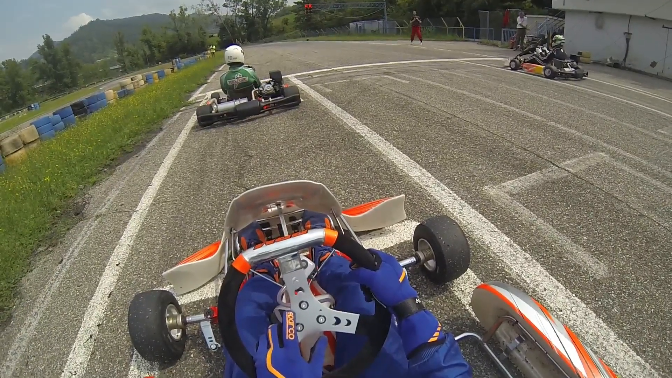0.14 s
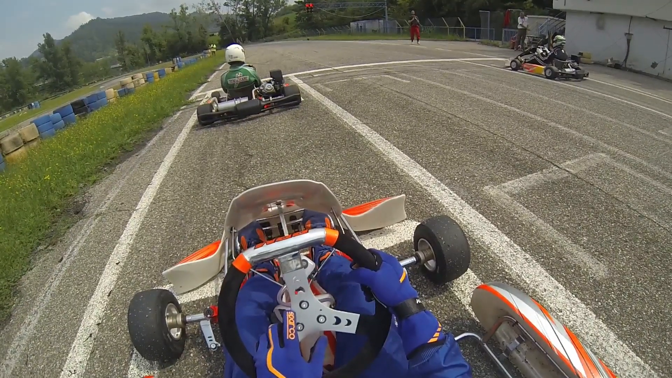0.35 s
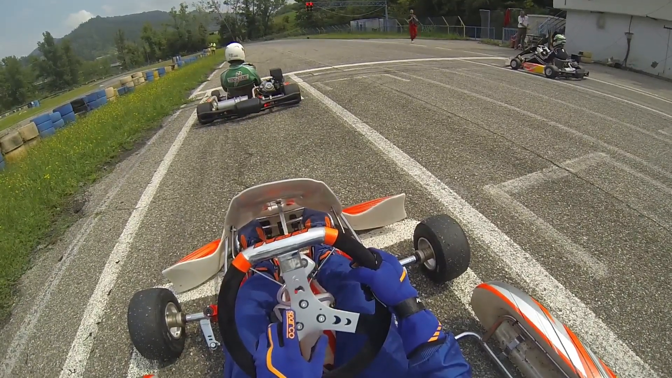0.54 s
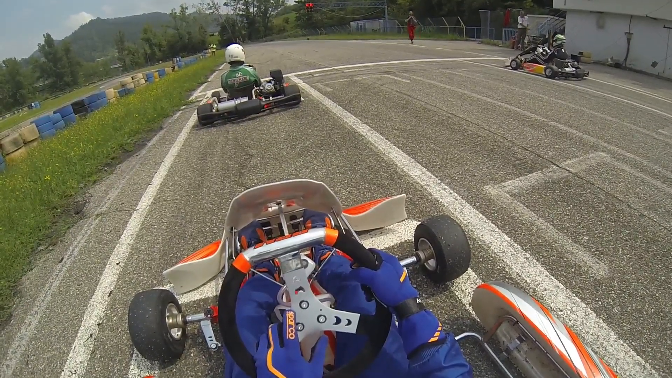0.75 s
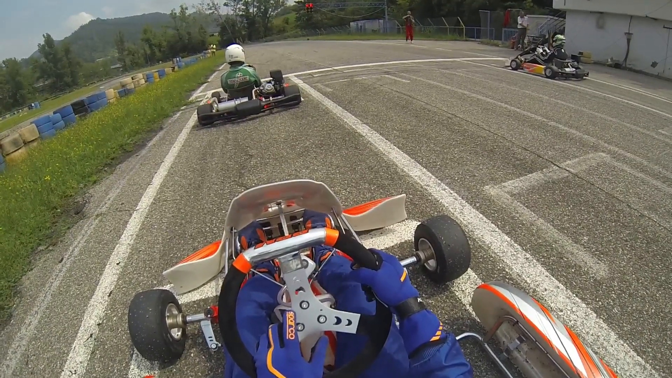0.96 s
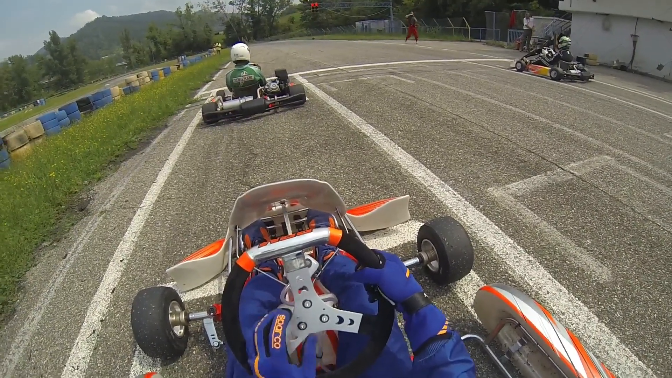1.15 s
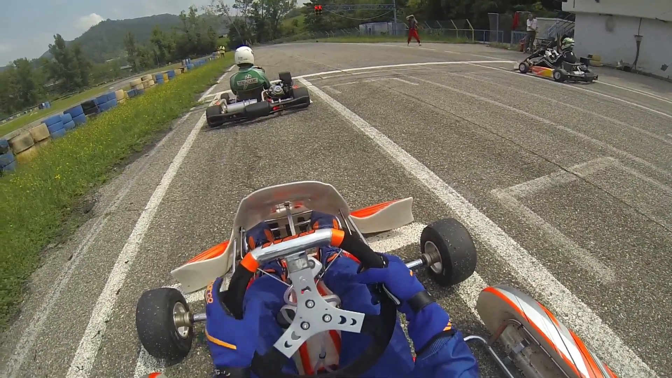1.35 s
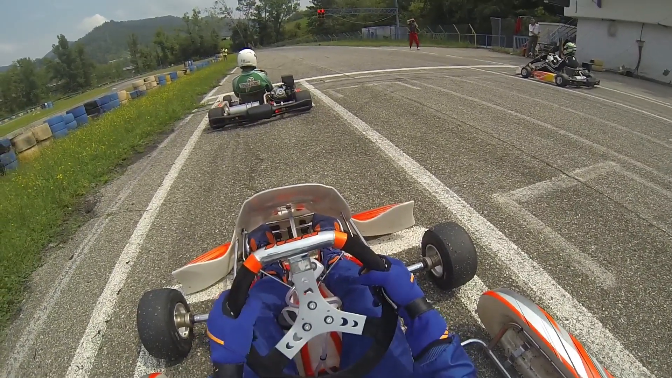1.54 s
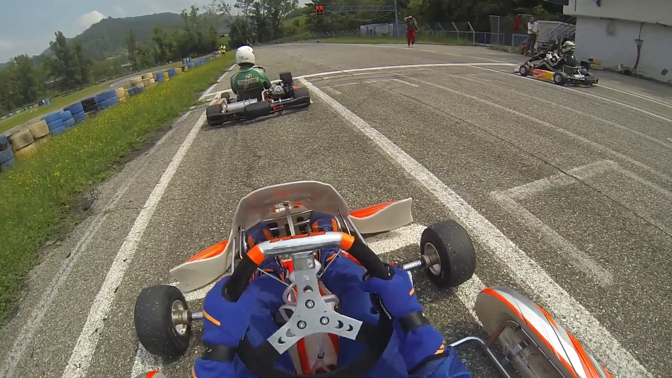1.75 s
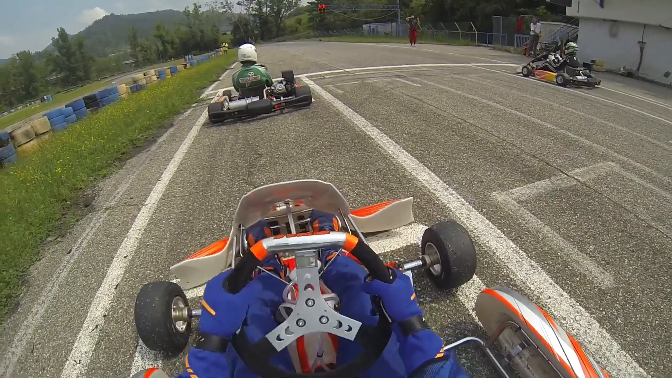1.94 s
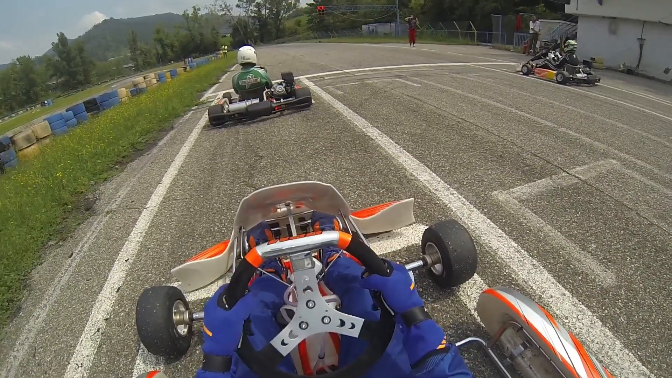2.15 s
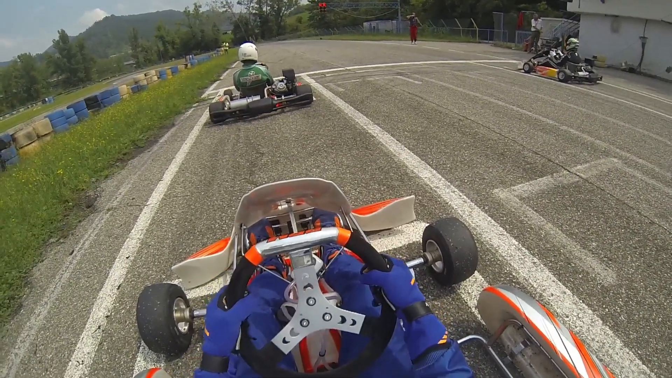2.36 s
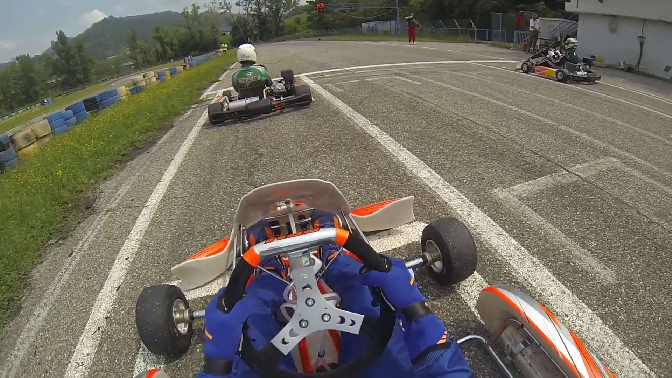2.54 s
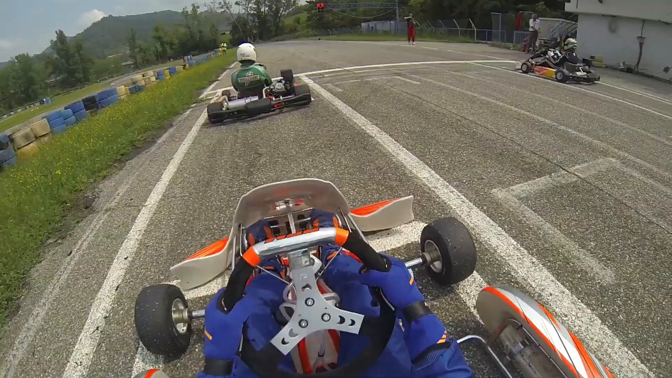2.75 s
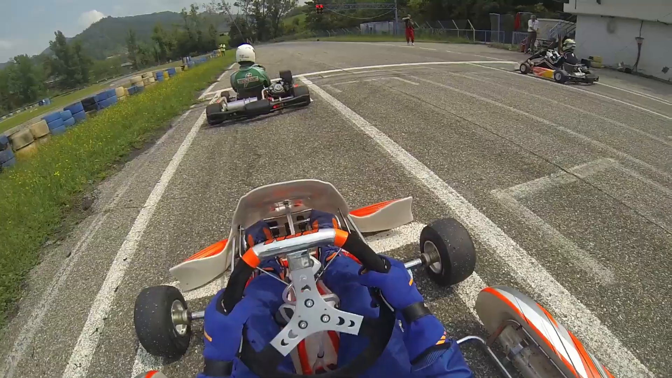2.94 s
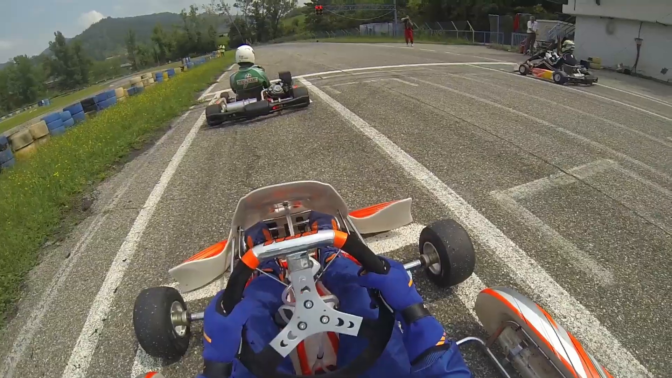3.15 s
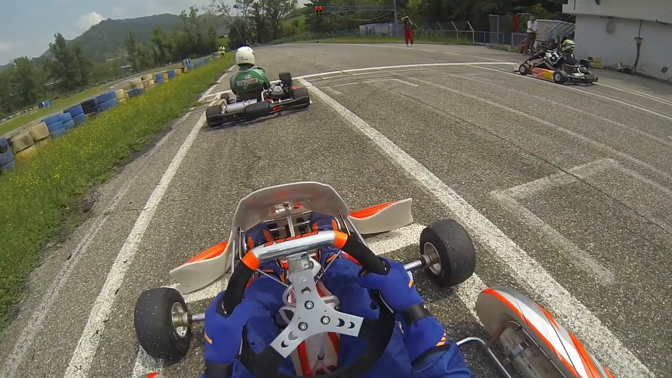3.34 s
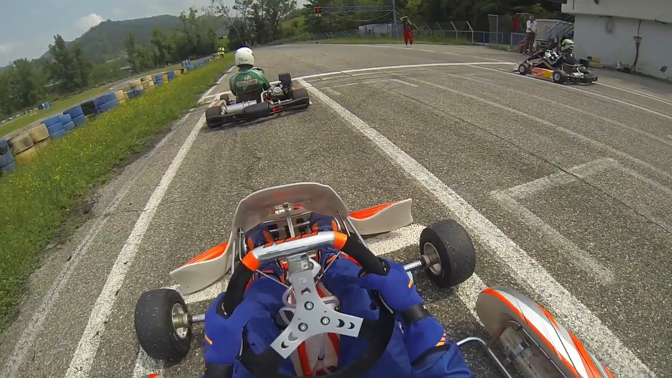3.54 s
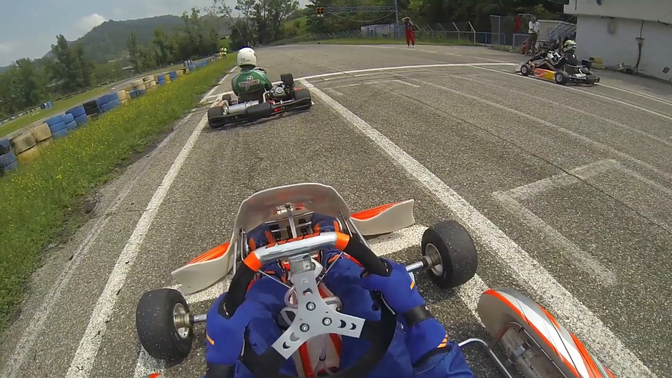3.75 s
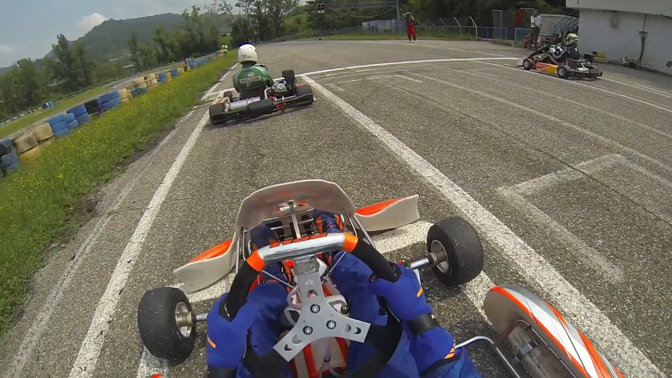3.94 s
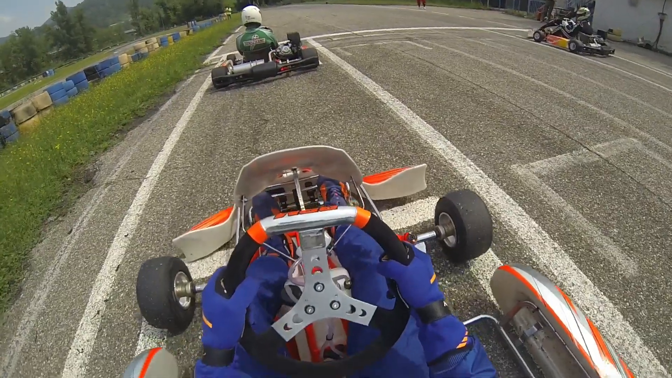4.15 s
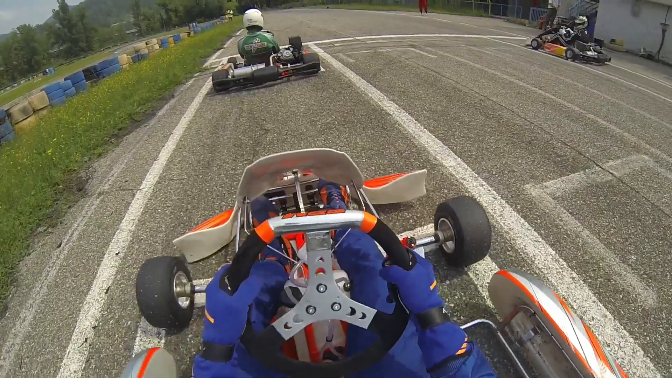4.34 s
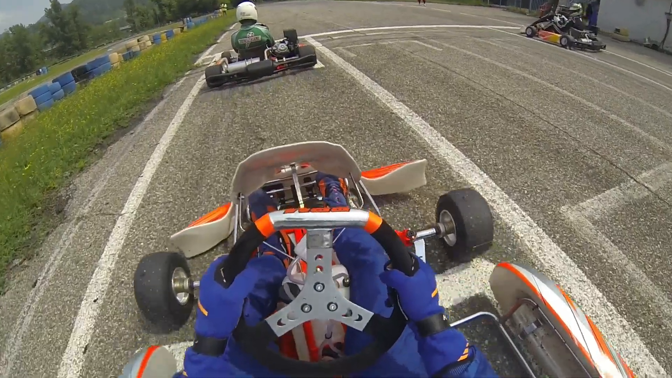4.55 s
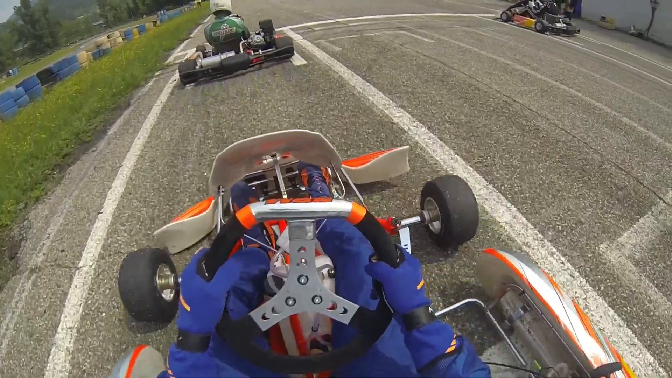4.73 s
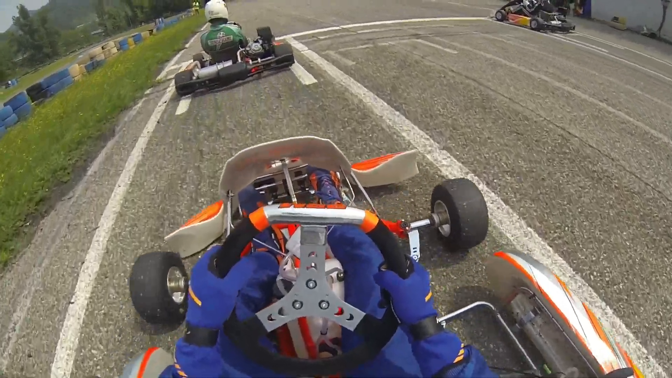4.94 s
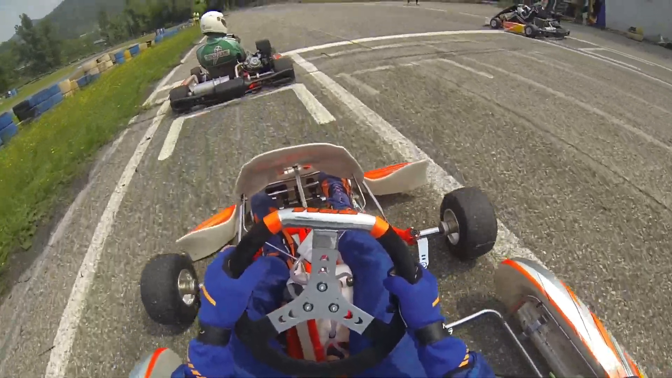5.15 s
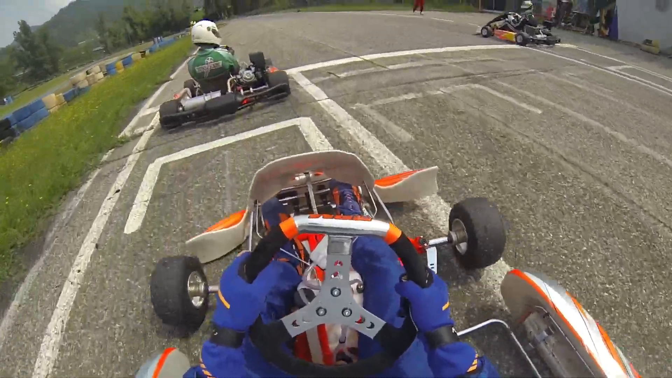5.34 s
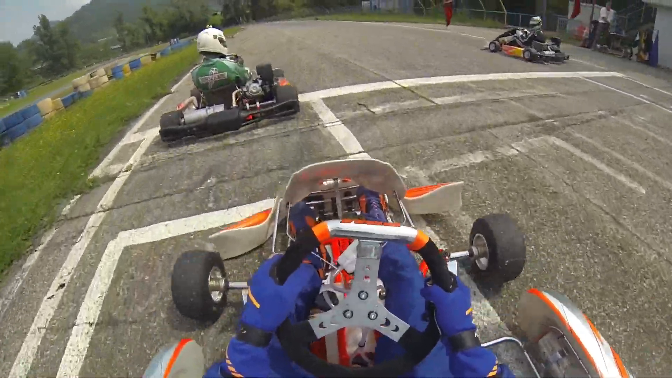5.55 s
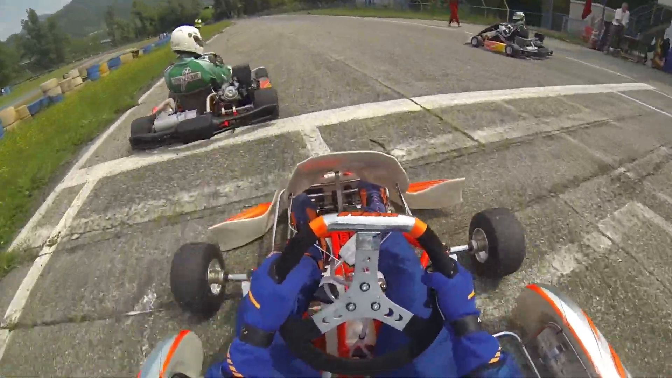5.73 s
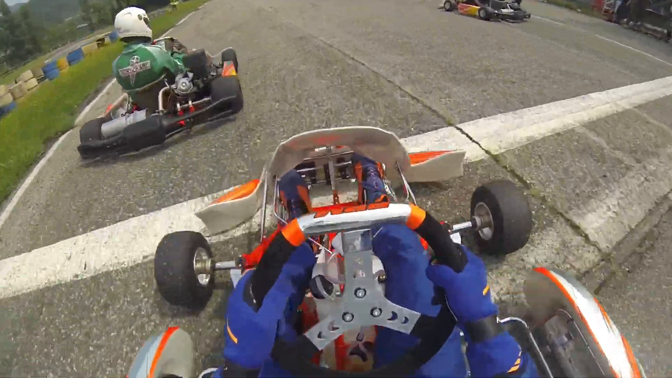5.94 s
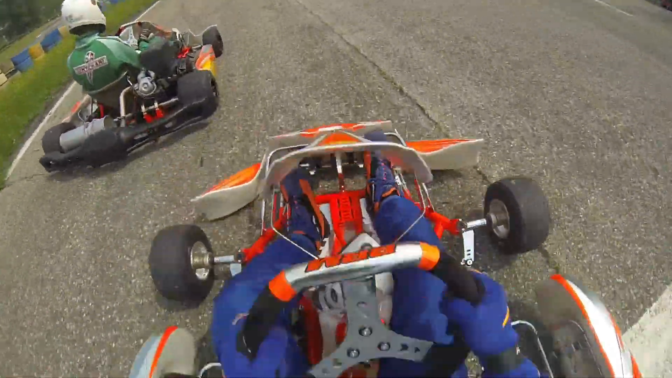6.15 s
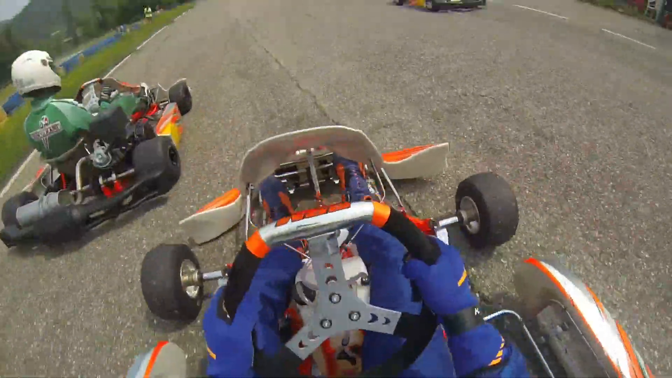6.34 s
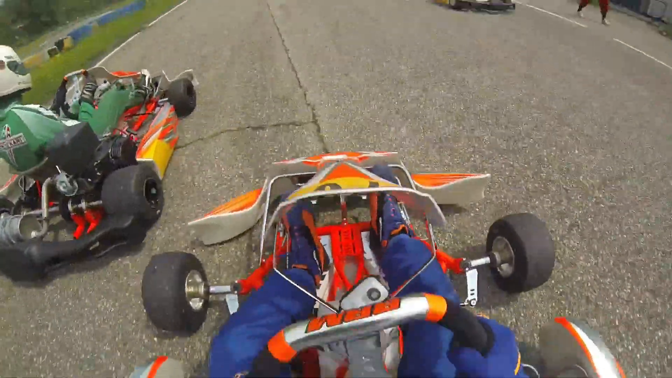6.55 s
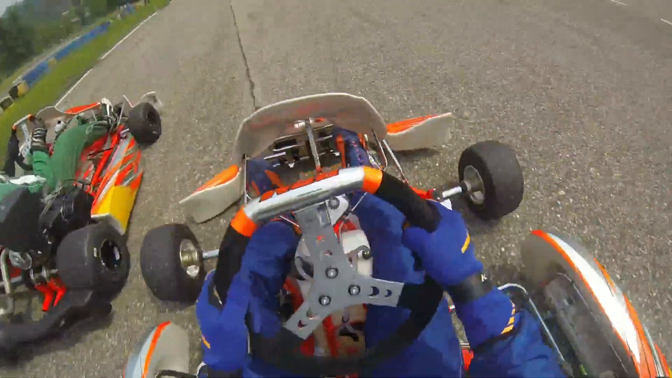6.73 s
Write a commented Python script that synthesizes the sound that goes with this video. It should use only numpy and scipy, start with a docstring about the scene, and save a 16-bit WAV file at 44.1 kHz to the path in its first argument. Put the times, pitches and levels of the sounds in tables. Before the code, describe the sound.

From 0 to about 3.8 seconds a small single-cylinder four-stroke kart engine idles evenly, around fifteen soft thumps a second, with dry valve and cover rattle between them and a low lumpy murmur of other idling karts. The sound is close, boxy and muffled, as from a sealed housing on the driver's helmet outdoors. At 3.8 it bogs for an instant, then catches with a few sharp cracks; the revs flare until about 4.3 and settle into a steady, much louder growling pull, raspy and ringing, with frame vibration, chain hiss and rolling rumble. From about 5.8 wind flutters low, and a thin chatter has crept in. Big gusts thud around 6.05. At about 6.15 the throttle lifts: bark and thump fall away, revs sag until 6.45, then recover slightly, while more deep wind thumps strike around 6.35 and 6.75 to the end at 6.8.

```python
"""Kart idling, pulling away and lifting off

A single-cylinder four-stroke idles among other karts, pulls away under throttle, then lifts off.
From inside a closed housing on the helmet one hears the exhaust thump and shaking frame as pulses and
sines locked to the firing cycle; clatter, bark, chain hiss and rolling chassis are noise swelling
each cycle, much of it rung by fixed bands of housing and engine shell. Late on, a narrow chatter,
fluttering wind and single low gusts join in."""
import sys
import numpy as np
from scipy import signal
from scipy.fft import rfft, irfft, next_fast_len
from scipy.io import wavfile
from scipy.ndimage import uniform_filter1d

SR = 44100
rng = np.random.default_rng(int(sys.argv[2]) if len(sys.argv) > 2 else 0)


def master(y):
    """Save y as 16-bit WAV."""
    cut = np.clip(np.atleast_2d(y).T, -1, 1)
    pcm = np.round(cut * 32767)  # scale
    wavfile.write(sys.argv[1], SR, pcm.astype(np.int16))


N = 299439
T = np.arange(N) / SR  # s
OPEN_S, LIFT_S = 3.8, 6.15  # the throttle opens; the foot is off


def undb(db):
    """Decibels to gain."""
    return 10 ** (np.asarray(db) / 20)


def unit(x):
    """Scale to rms 1."""
    return x / np.sqrt(np.mean(x ** 2))


def shape(table, hz):
    """Power response through points of f/Hz, level/dB joined on a log frequency axis."""
    f, db = np.transpose(table)
    return undb(np.interp(np.log(hz + 1), np.log(f), db)) ** 2


def rings(modes, hz):
    """Summed power response of steep resonances: f/Hz, half-width/Hz (6 dB down), level/dB."""
    return sum(undb(db) ** 2 / (1 + ((hz - f) / w) ** 2) ** 2 for f, w, db in modes)


def colour(x, power):
    """Causal filter with the given power response (minimum phase from the cepstrum)."""
    size = next_fast_len(N + SR, real=True)
    hz = np.arange(size // 2 + 1) * SR / size
    cepstrum = irfft(np.log(power(hz) + 1e-12) / 2, size)
    # fold the cepstrum onto positive time
    cepstrum[1:size // 2] *= 2
    cepstrum[size // 2 + 1:] = 0
    response = np.exp(rfft(cepstrum))
    return irfft(rfft(x, size) * response, size)[:N]


def housing(hz):
    """Power response of the ringing housing and engine shell."""
    # resonances: f/Hz, half-width/Hz, level/dB
    modes = [(375, 22, -16), (603, 39, -11.5), (955, 58, -8), (1114, 52, -6), (1593, 93.6, 2.5),
             (1882, 257, -8.5), (2192, 49, -6.5), (3075, 260, -21.5), (3786, 330, -18.5), (5035, 160, -25),
             (5390, 330, -24), (6540, 690, -31), (7764, 290, -25.5)]
    # floor between the resonances: f/Hz, level/dB
    floor = [(100, -32), (450, -24.5), (800, -16.5), (1270, -18.5), (2600, -22), (4500, -40.5),
             (8600, -39.5), (12000, -43.5), (13800, -48), (15000, -59)]
    return rings(modes, hz) + shape(floor, hz)


def walk(rate):
    """Wandering random signal of rms 1: levels held 1 / rate seconds, then slewed twice."""
    k = int(SR / rate)
    held = rng.standard_normal(4000)[np.arange(N) // k]
    slewed = uniform_filter1d(held, k)
    return unit(uniform_filter1d(slewed, k))


def gritty(spread_db):
    """Noise whose samples come in uneven sizes, like many small knocks."""
    return rng.standard_normal(N) * undb(spread_db * rng.exponential(size=N))


def per_cycle(cycles, at):
    """Two even chances in -1..1 for each cycle, and the cycles since `at`, from -.5 to .5."""
    chance = rng.uniform(-1, 1, (500, 2)).T
    turn = np.floor(cycles - at + .5).astype(int) + 1
    return chance[:, turn], cycles - at + 1 - turn


def puff(cycles, at, rise, fall, scatter_db, slip):
    """One swell a cycle, peaking near `at` cycles after the firing, with its own size and timing."""
    chance, late = per_cycle(cycles, at)
    late = late - slip * chance[0]
    swell = np.exp(np.where(late < 0, late / rise, -late / fall))
    return undb(scatter_db * chance[1]) * swell


def gain(layer, buffet):
    """Layer gain: catches and swells with the throttle, drifts, drops at the lift, then follows gusts."""
    # mix of each layer: idle level/dB, level at the first strong firings/dB, swell time/s,
    # swollen level/dB, level late in the pull/dB, drop time/s, coasting level/dB, most gust boost/dB
    # (a negative time turns that slope into a jump)
    mix = dict(thump=(-37, -36, .65, -24.5, -22, .04, -45, 17),
           clatter=(-36, -35, 0.55, -25.5, -24, 0, -29.5, 5),
           bark=(-51, -31, 0.55, -26.5, -29.5, 0.2, -37.5, 1.5),
           chassis=(-58.5, -37.5, .22, -29, -27.5, 0.3, -30.5, 2),
           once=(-35.5, -32, -0.05, -26.5, -18.5, 0.1, -42, 6),
           twice=(-36.5, -34.5, 0.6, -31.5, -26, 0.24, -42, 3),
           rush=(-56.5, -42, 0.3, -36, -32, -0.16, -36, 1))
    idle_db, catch_db, swell_s, swollen_db, late_db, drop_s, coast_db, buffet_db = mix[layer]
    catch_s = 0.093  # from the throttle opening to the first strong firings
    times = OPEN_S, OPEN_S + catch_s, OPEN_S + swell_s, LIFT_S - drop_s, LIFT_S
    level_db = np.interp(T, times, (idle_db, catch_db, swollen_db, late_db, coast_db))
    coasting = np.interp(T, times[-2:], (0, 1))
    return undb(level_db + buffet_db * buffet * coasting)


def thump(cycles, load):
    """The blowdown pulse, later at idle, rings pipe and frame; the sealed housing passes only its swing."""
    # exhaust pipe and frame resonances: f/Hz, half-width/Hz, relative level/dB
    pipe = [(15.5, 5.2, 2.5), (43.5, 39.7, -2), (63.6, 10, 0.5), (93.5, 9.3, -7.5), (150, 45, -27)]
    push = puff(cycles, .14 - 0.333 * load, 0.012, 0.04, 1.9, 0.042)

    def pipe_in_housing(hz):
        return rings(pipe, hz) * hz ** 2 / (hz ** 2 + 45 ** 2)  # low cut at 45 Hz
    return unit(colour(push, pipe_in_housing))


def shake(cycles, buffet):
    """Two crank turns a cycle: the unbalanced piston shakes the frame once and twice a turn."""
    angle = 4 * np.pi * (cycles + 0.038 * walk(14))  # the crank runs unevenly
    once = gain("once", buffet) * undb(1.6 * walk(3.02)) * np.cos(angle)
    twice = gain("twice", buffet) * undb(2.5 * walk(3.82)) * np.cos(2 * angle)
    return -np.sqrt(2) * (once + twice)


def clatter(cycles, load):
    """Valve gear, fins and covers rattle in two bursts a cycle, by part; load quiets the valve burst."""
    # parts that rattle on their own: centre f/Hz, steady share, burst after the firing,
    # valve burst, place of the valve burst/cycles
    parts = [(404, 0.92, 1, 0.36, 0.65), (924, 0.42, 1, 1, 0.706), (1750, 0.31, 0.87, 0.91, 0.5),
             (3250, 0.66, 0.4, 0.82, 0.597), (6200, 0.27, 0.4, 0.82, 0.615),
             (10900, 0.33, 0.18, 0.11, 0.43)]

    def near(hz, centre):
        return np.exp(-(np.log((hz + 1) / centre) / .6) ** 2) + 1e-6

    out = 0
    for part_hz, steady, first, valve, place in parts:
        gate = steady + first * puff(cycles, .17 - .07 * load, .03, .07, 2.5, .025)
        gate = gate + valve * (1 - .7 * load) * puff(cycles, place, .09, .12, 2.0, .03)
        knocks = gate * undb(1.0 * walk(90)) * gritty(1.96)

        def part_band(hz):
            share = near(hz, part_hz) / sum(near(hz, p[0]) for p in parts)
            return housing(hz) * share
        out = out + colour(knocks, part_band)
    return unit(out)


def idlers():
    """The low lumpy murmur of other idling karts: slowly wandering low noise."""
    # murmur spectrum: f/Hz, relative level/dB
    murmur = [(10, -14), (30, 2), (62, -5), (100, -7), (125, -16), (220, -23), (380, -35), (430, -35),
              (800, -87)]
    lumpy = undb(3.0 * walk(28)) * rng.standard_normal(N)
    return undb(-34.5) * unit(colour(lumpy, lambda hz: shape(murmur, hz)))


def bark(cycles, throttle):
    """Gas cracks from the pipe at each firing; on the throttle a ring of changing pitch rides on it."""
    # crack colour over the housing response: f/Hz, level/dB
    tilt = [(150, -10), (500, -4), (1300, 3), (1600, -1), (1900, 3), (2600, 6), (3200, 8), (4500, 1),
            (6000, -8), (15000, -22)]
    gate = .3 + puff(cycles, -.05, .04, .13, 3.0, .03)
    rasp = gate * undb(2.0 * walk(150)) * rng.standard_normal(N)
    crack = unit(colour(rasp, lambda hz: housing(hz) * shape(tilt, hz)))

    ring_hz = 3250 + 350 * per_cycle(cycles, -0.0585)[0][0]  # a new pitch each cycle
    tone = np.sin(2 * np.pi * np.cumsum(ring_hz) / SR)
    rough = uniform_filter1d(rng.standard_normal(N), size=40)
    ring = puff(cycles, -.05, .03, .09, 4.0, .03) * rough * tone
    return crack + undb(-10.5) * throttle * unit(ring)


def rush(cycles):
    """Hiss: the chain jerks once a crank turn and bright ticks fall about three a cycle."""
    # tilt over the housing response: f/Hz, level/dB
    tilt = [(400, 11), (1200, -1), (1600, -6.5), (1950, 3.5), (3000, -4), (3800, 9.5), (5500, 9.5),
            (8000, 8.5), (12000, 10.5), (15000, 6)]
    split_hz = 4500  # chain below, ticks above
    jerk = 0.55 + puff(2 * cycles, 0.22, 0.064, 0.086, 2.0, 0.17)
    ticks = .55 + puff(3 * cycles, -.15, .08, .25, 5.5, .2)

    def below(hz):
        return housing(hz) * shape(tilt, hz) / (1 + (hz / split_hz) ** 6)

    def above(hz):
        return housing(hz) * shape(tilt, hz) / (1 + (split_hz / (hz + 1)) ** 6)

    chain = colour(jerk * gritty(1.1), below)
    bright = colour(ticks * gritty(1.2), above)
    return unit(chain + bright)


def chassis(cycles):
    """Tyres, chain and seat drum as low-band noise; each firing kicks the frame."""
    # drumming spectrum: f/Hz, relative level/dB
    drum = [(90, -0.5), (140, -1.5), (200, -1.5), (270, -1.5), (365, 0.5), (410, -11), (700, -11),
            (1300, -22.5), (3000, -48)]
    kick = 2.8 + puff(cycles, -0.026, 0.052, 0.12, 2.3, 0.14)
    rumble = kick * undb(0.76 * walk(30)) * rng.standard_normal(N)
    return unit(colour(rumble, lambda hz: shape(drum, hz)))


def hard_firings():
    """Brief gain bumps on the bark for strokes that fire harder than their neighbours."""
    # hard strokes: t/s, extra level/dB
    strokes = [(3.858, 4.5), (3.978, 7), (4.408, 4.5), (4.785, 2.5), (5.39, 3.5)]
    lasts_s = 0.011
    return undb(sum(db * np.exp(-((T - at) / lasts_s) ** 2) for at, db in strokes))


def chatter(cycles):
    """Short noise bursts ring one narrow band about once a crank turn."""
    # chatter swell: t/s, level/dB
    swell = [(5.3, -65), (6.05, -38), (6.3, -39.5), (6.5, -45.5)]
    taps = (0.14 + puff(2 * cycles, 0.11, .08, .3, 8.0, 0.38)) * rng.standard_normal(N)
    ringing = unit(colour(taps, lambda hz: rings([(3750, 200, 0)], hz)))
    return undb(np.interp(T, *np.transpose(swell))) * ringing


def wind():
    """Wind flutters the housing as a narrow low noise band that sets in late, then fades."""
    start_s, rise_s = 5.75, .15
    start_db, fade_db_per_s = -20.5, 13.5
    onset = np.clip((T - start_s) / rise_s, 0, 1)
    flutter = unit(colour(rng.standard_normal(N), lambda hz: rings([(88.7, 11.6, 0)], hz)))
    return onset * undb(start_db - fade_db_per_s * (T - start_s)) * flutter


def wind_thumps():
    """Gusts strike the housing in single thumps, and slow heaves join them: cosines under short bell envelopes."""
    # gusts and slow heaves: t/s, peak level/dB, f/Hz
    gusts = [(6.019, -8, 61), (6.043, -5, 69), (6.089, -15.5, 100), (6.104, -10.5, 10.2),
             (6.122, -7.5, 29.6), (6.307, -12, 12.4), (6.324, -13, 33), (6.347, -6.5, 55),
             (6.386, -8.5, 49), (6.412, -11, 83), (6.453, -13.5, 16.8), (6.513, -11.5, 18),
             (6.69, -16.5, 74), (6.728, -6, 15.3), (6.759, -6.5, 29.6), (6.782, -11.5, 102)]
    swings = 2.58  # length of a thump in swings of its pitch
    out = 0
    for at, db, hz in gusts:
        bell = np.exp(-(2.5 * (T - at) * hz / swings) ** 2)
        out = out + undb(db) * bell * np.cos(2 * np.pi * hz * (T - at))
    return out


def scene():
    """One firing cycle drives all the kart's layers; other karts and wind are added."""
    # engine speed: steady idle, a short bog, a flare, dragged down by the clutch, falling after
    # the lift: t/s, firing rate f/Hz
    revs = [(3.6, 14.75), (3.8, 12.3), (3.93, 16.6), (4.1, 19.75), (4.25, 23.3), (4.4, 22.32), (4.7, 20.6),
            (5.0, 19.93), (5.3, 19.4), (5.6, 19.7), (5.9, 19.46), (6.15, 19.62), (6.45, 14.78),
            (6.79, 16.67)]
    firing_hz = np.interp(T, *np.transpose(revs))
    cycles = .38 + np.cumsum(firing_hz) / SR  # starts .38 cycles after a firing
    load = np.clip((T - OPEN_S) / .18, 0, 1)  # the load takes .18 s to build
    lift = np.clip((LIFT_S - T) / 0.23, 0, 1)  # the ring of the bark fades out toward the lift

    thumps = wind_thumps()
    settle_s = 0.13  # averaging time of the thumps' and heaves' shaking
    buffet = uniform_filter1d(np.abs(thumps), int(settle_s * SR))
    buffet = buffet / buffet.max()

    # the exhaust thumps harder while the revs flare above the pulling rate
    pull_hz, db_per_hz = 20.06, 3.0
    flare = undb(db_per_hz * np.maximum(firing_hz - pull_hz, 0))
    layers = dict(
        thump=flare * thump(cycles, load),
        clatter=clatter(cycles, load),
        bark=hard_firings() * bark(cycles, load * lift),
        chassis=chassis(cycles),
        rush=rush(cycles))
    kart = sum(gain(name, buffet) * x for name, x in layers.items())
    kart = kart + shake(cycles, buffet) + chatter(cycles)
    return (kart + idlers() + wind() + thumps)[None]


def record(dry):
    """A steep elliptic low-pass cuts the top above 15.1 kHz."""
    top_cut = signal.ellip(8, .2, 60, 15100, fs=SR, output="sos")
    return signal.sosfilt(top_cut, dry)


dry = scene()
out = record(dry)
master(out)
```